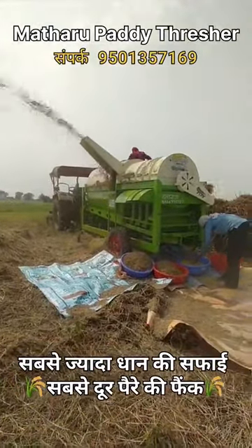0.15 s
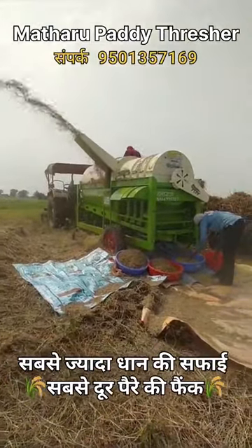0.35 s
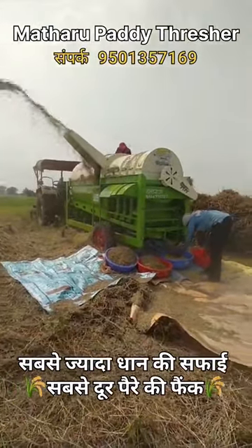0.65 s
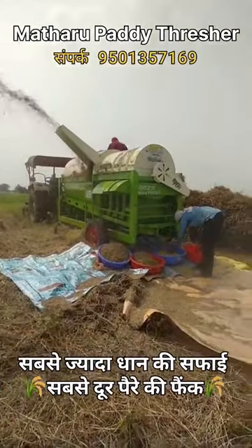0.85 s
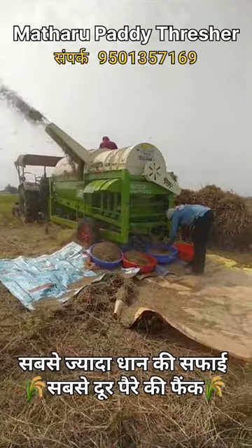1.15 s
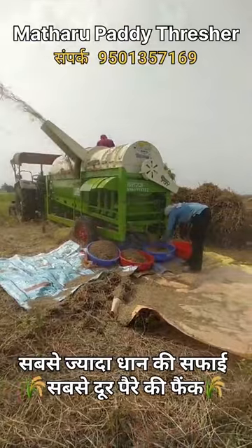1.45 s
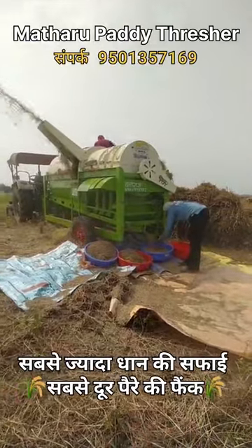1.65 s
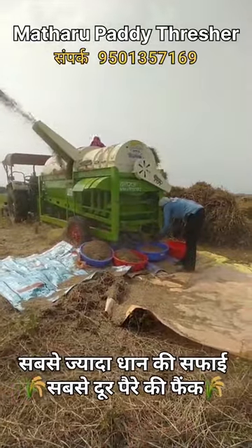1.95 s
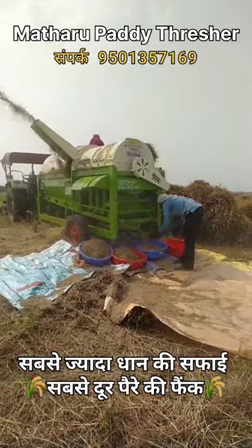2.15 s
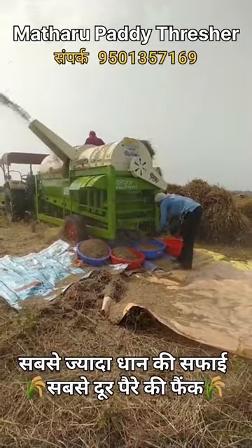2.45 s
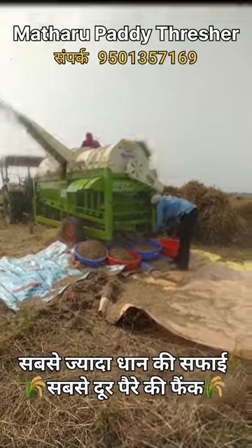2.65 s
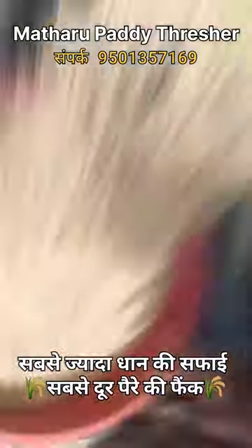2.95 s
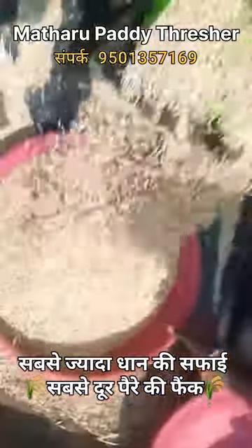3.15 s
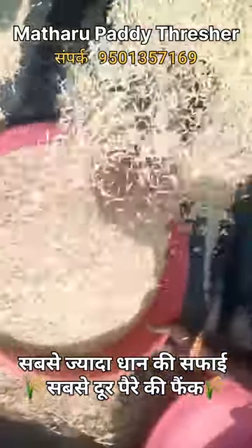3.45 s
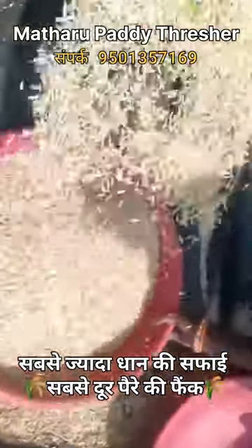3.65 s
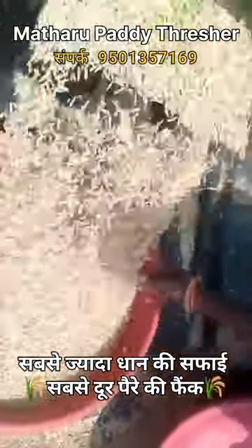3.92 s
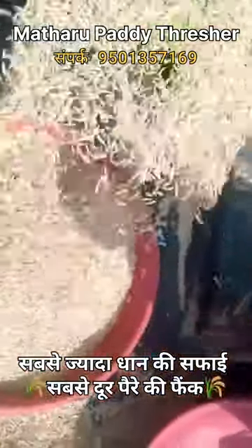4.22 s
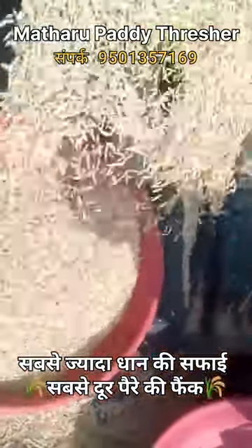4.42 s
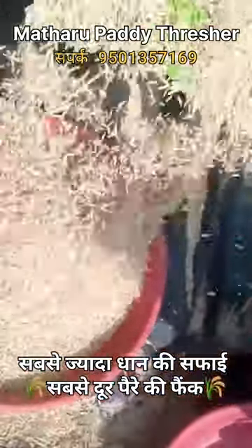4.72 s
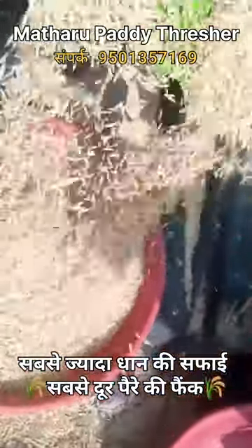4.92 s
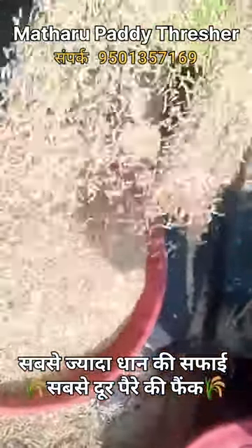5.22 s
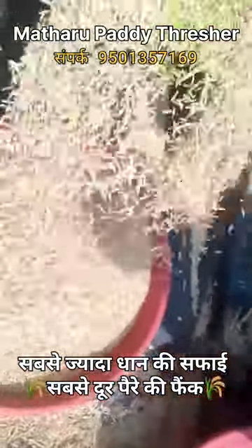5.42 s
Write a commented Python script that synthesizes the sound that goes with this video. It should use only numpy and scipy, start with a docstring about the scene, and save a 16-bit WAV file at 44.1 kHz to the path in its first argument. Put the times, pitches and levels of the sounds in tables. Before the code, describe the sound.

A diesel tractor drives a rice thresher in an open field, heard from a few metres away. The engine throbs loudly under a blower's roar and hissing chaff, with short, sharp slashes as the drum catches straw. About halfway through, the sound cuts to a much quieter close view of the grain outlet: a low hum, a buzzing steel frame, clattering sieves and rice pouring steadily into a basin.

```python
"""A tractor's diesel throbs as it drives a paddy thresher in an open field; the sound is mono.
From a few metres off, exhaust harmonics beat against those of the straw blower, air roars,
and the drum slashes through straw. Then an abrupt change to the grain outlet: the engine is
a quiet hum, the shaft forces a steel frame to buzz, and random impacts excite clattering
sieves, a ringing chute and the basin that the rice pours into."""
import sys
import numpy as np
from scipy import signal
from scipy.fft import rfft, irfft, next_fast_len
from scipy.io import wavfile
from scipy.ndimage import uniform_filter1d

SR = 44100
rng = np.random.default_rng(int(sys.argv[2]) if len(sys.argv) > 2 else 0)


def wrap_up_sound(samples):
    """Save the sound to the file named by the first command line argument, as 16-bit audio."""
    columns = np.atleast_2d(samples).T
    # keep every value between -1 and 1, then stretch to whole-number steps
    tamed = np.clip(columns, -1, 1)
    steps = np.round(tamed * 32767).astype(np.int16)
    wavfile.write(sys.argv[1], SR, steps)


N = 246078
T = np.arange(N) / SR
CUT_S = 3.024  # from the field to the outlet


# Exhaust harmonics: crank_multiple, field_level_db, outlet_level_db
EXHAUST_HARMONICS = [(1, -74, -71), (2, -43, -52), (3, -37.5, -60), (4, -34.5, -64), (5, -41.5, -67.5),
                     (6, -42, -69), (7, -42, -65.5), (9, -46.5, -99), (10, -50, -72)]

def exhaust(crank, at_outlet=False):
    """Periodic gas pulses radiate a harmonic series on the rotation rate of the crank."""
    orders = [(k, outlet_db if at_outlet else field_db) for k, field_db, outlet_db in EXHAUST_HARMONICS]
    return drone(crank, orders, waver_db=1.0)


# Blower harmonics: shaft_multiple, level_db
BLADE_HARMONICS = [(2, -59), (3, -47.5), (4, -31.5), (5, -42), (6, -41.5), (7, -57.5), (12, -49)]

def blower(shaft):
    """Four blades put the strongest tone at the blade-passing frequency, four times the shaft rate."""
    return drone(shaft, BLADE_HARMONICS, waver_db=1.2)


# Air spectrum: frequency_hz, density_db_per_hz
AIR_SPECTRUM = [(20, -89), (48, -78), (70, -67), (110, -55), (155, -58), (245, -59), (400, -58.5),
                (660, -56.5), (765, -59), (850, -73), (1500, -72), (3700, -73), (4100, -84.5),
                (9000, -102.5)]

def air_roar(shaft):
    """Turbulence gives broadband noise, amplitude-modulated as the blades chop the air."""
    gusts = 1 + 0.086 * tone(shaft, 2) + 0.068 * tone(shaft, 4)
    return colour(rng.standard_normal(N) * gusts * amp(0.47 * drift(37)), slope(AIR_SPECTRUM))


# Peaks in the straw's roar, coloured by reflection off the ground: centre_hz, width_hz, peak_db_per_hz
STRAW_ROAR_PEAKS = [(1014, 123, -63), (1151, 325, -64.5), (1355, 430, -69.5), (1696, 154, -65.5),
                    (2088, 176, -67), (2620, 160, -65.5), (3145, 213, -68.5), (3670, 36, -72),
                    (4750, 330, -75.5), (5450, 330, -78), (6740, 250, -74.5)]

def threshing(beaters):
    """Random impacts of straw merge into a roar, with the comb-filter peaks of a ground reflection."""
    impacts = patter(10000, 0.92) * beaters * amp(0.48 * drift(30))
    return colour(impacts, panels(humps(STRAW_ROAR_PEAKS), ripple_db=1.5, spacing_hz=25.04))


# Wads caught by the drum, mostly at the same point of its turn; thick stalks tear duller:
# start_s, level_db, decay_s, tilt_db_per_octave
STRAW_WADS = [(0.054, -32, .014, 0), (0.178, -35.5, .009, -2), (0.325, -34, .006, 4),
              (0.783, -31, .011, -2), (0.905, -26.5, 0.0095, -3), (1.027, -35.5, .008, 6),
              (1.146, -29, .007, -4), (1.268, -32, .008, -1), (1.386, -34, .006, -1),
              (1.992, -33.5, 0.013, 6), (2.114, -34, .01, 0), (2.354, -32, .036, -3)]
# Spectrum of tearing straw: frequency_hz, relative_db
TEAR_SPECTRUM = [(800, -20), (2200, -7), (3300, -1), (4200, -4), (6500, 0), (7750, -1), (8300, -13),
                 (15000, -24)]

def slashes(rise_s=0.004, pivot_hz=5500):
    """Fracture: each wad tears in a burst of snaps that decays exponentially."""
    out = np.zeros(N)
    snaps = patter(14000, 1.6)
    spectrum = slope(TEAR_SPECTRUM)
    for start_s, level_db, decay_s, tilt_db in STRAW_WADS:
        first = round(start_s * SR)
        span = slice(first, first + SR // 4)
        age = T[span] - T[first]
        burst = (1 - np.exp(-age / rise_s)) * np.exp(-age / decay_s)
        gain = lambda hz: spectrum(hz) * amp(tilt_db * np.log2(np.clip(hz / pivot_hz, .5, 2)))
        out[span] += amp(level_db) * burst / burst.max() * evened(colour(snaps[span], gain))
    return out


# Drive gear tones: teeth_per_crank_turn, level_db
GEAR_MESHES = [(36, -48), (54, -71)]

def gear_whine(crank):
    """Gears sound at the tooth-meshing frequency; backlash blurs it by phase modulation."""
    return drone(crank + 0.0017 * drift(7.3), GEAR_MESHES, waver_db=2.0)


# Chaff spectrum: frequency_hz, density_db_per_hz
CHAFF_SPECTRUM = [(2000, -100), (4000, -82.5), (5400, -80), (6000, -77), (7700, -77.5), (8000, -84.3),
                  (10300, -86.7), (11400, -83.8), (12300, -78.7), (13100, -76.7), (15500, -81)]

def chaff_jet(beaters):
    """Dense tiny impacts of chaff merge into a hiss, like shot noise."""
    impacts = patter(40000, .3) * beaters
    return colour(impacts, panels(slope(CHAFF_SPECTRUM), ripple_db=.9, spacing_hz=60))


# Engine speed, sagging as sheaves go in: time_s, speed_rpm
FIELD_SPEED = [(0.0, 1988), (1.2, 1976), (2.14, 2002), (2.53, 1934), (3.02, 1945)]
# Sheaves passing through the drum: start_s, length_s, rise_db
SHEAF_LOADS = [(-0.2, 0.65, 1.5), (0.677, 0.95, 2.5), (1.955, 0.35, 2.0), (2.218, 0.41, 3)]

def field():
    """Exhaust and blower beat at nearby frequencies; each sheaf swells the noises in one arch."""
    crank = np.cumsum(speed(FIELD_SPEED)) / SR
    shaft = crank * .869  # belt ratio; it slips a little more in the field
    drum = crank / 4
    load_db = -1.45  # the nearly empty drum
    for start_s, length_s, rise_db in SHEAF_LOADS:
        load_db += rise_db * np.sin(np.pi * np.clip((T - start_s) / length_s, 0, 1))
    throb = exhaust(crank) + blower(shaft)
    whine = gear_whine(crank)
    roar = amp(0.43 * load_db) * air_roar(shaft)
    beaters = 1 + 0.011 * tone(drum, 5) + 0.024 * tone(drum, 1)  # five rows of pegs sweep the straw
    straw = amp(load_db) * threshing(beaters)
    chaff = amp(0.22 * load_db) * chaff_jet(beaters)
    return throb * amp(.5 * drift(7.0)) + whine + roar + straw + chaff + slashes()


# Envelope of the shaft harmonics: frequency_hz, level_db
BUZZ_SPECTRUM = [(55, -65), (130, -72), (220, -72), (420, -76), (600, -76), (1020, -76), (1200, -65.5),
                 (1330, -52.5), (1560, -72.5), (2080, -65.5), (2600, -89)]
# Sharp modes of the steel frame: centre_hz, width_hz, peak_db
FRAME_MODES = [(255.2, 7.6, -53.5), (299.2, 8.3, -53.5), (374, 9.3, -61), (404.7, 11, -57.5),
               (440.7, 11.7, -56), (506, 9.3, -60.5), (1136, 9.6, -53.5), (1160, 11, -79), (1205, 21, -56),
               (1270, 9.7, -65), (1393, 16, -49.5), (1515, 11, -54.5), (1825, 11, -69), (2215, 15, -57.5),
               (2294, 12, -58.5), (2453, 19, -61.5)]

def frame_buzz(shaft_hz, rattle, odd_db=-5, waver_db=5.0):
    """Forced vibration: shaft harmonics flare up as the speed carries them over the frame's modes."""
    turns = np.cumsum(shaft_hz) / SR + .0007 * drift(30)
    coarse = slice(None, None, SR // 50)
    out = np.zeros(N)
    for k in range(2, 90):
        hz = k * shaft_hz[coarse]
        waver = np.tanh(evened(uniform_filter1d(rng.standard_normal(len(hz)), size=11)))
        # two knocks a turn favour even harmonics
        bed = slope(BUZZ_SPECTRUM)(hz) * amp(odd_db * (k % 2) + waver_db * waver)
        level = np.interp(T, T[coarse], np.hypot(bed, humps(FRAME_MODES)(hz)))
        in_sieve_range = 1000 < hz.mean() < 1600
        out += level * (rattle if in_sieve_range else 1) * tone(turns, k)
    return out


# Sieve tray resonances: centre_hz, width_hz, peak_db_per_hz
SIEVE_MODES = [(1120, 87, -91), (1288, 170, -72.5), (2850, 90, -90), (5490, 100, -89.5), (5760, 70, -92)]

def sieves(knocks):
    """Impact excitation: uneven blows make the loose trays clatter at their modes."""
    return colour(patter(3500, 2.3) * knocks, humps(SIEVE_MODES))


# Spectrum of rice landing in the basin: frequency_hz, density_db_per_hz
RICE_SPECTRUM = [(900, -100), (1600, -77.5), (2050, -78.5), (2400, -87), (2700, -86), (3400, -93.5),
                 (4400, -93), (5100, -97), (5900, -97.5), (6700, -101), (8400, -98), (9500, -111),
                 (12000, -125)]

def rice():
    """Independent grain impacts superpose into a steady pouring noise."""
    return colour(patter(12000, 0.57), panels(slope(RICE_SPECTRUM), ripple_db=2.5, spacing_hz=48.5))


# Grain chute resonances: centre_hz, width_hz, peak_db_per_hz
CHUTE_MODES = [(3760, 120, -88.5), (4000, 70, -81), (4130, 50, -83), (4950, 50, -96)]

def chute(fade_db_per_s=1.4):
    """Grains ring the steel chute at its natural frequencies; the ring slowly dies down."""
    fade = amp(-fade_db_per_s * (T - T[T > CUT_S].mean()))
    return fade * colour(patter(7000, 0.89), humps(CHUTE_MODES))


# Noise inside the machine: frequency_hz, density_db_per_hz
RUMBLE_SPECTRUM = [(20, -100), (48, -95), (80, -83), (120, -79.5), (190, -88), (235, -69.5), (275, -81),
                   (430, -78.5), (560, -84), (800, -87.5), (1100, -81.5), (3000, -105), (10000, -110),
                   (15500, -110.5)]

def rumble():
    """Stationary random noise with most of its power at low frequencies."""
    return colour(rng.standard_normal(N), slope(RUMBLE_SPECTRUM))


# Engine speed, hunting slowly under the governor: time_s, speed_rpm
OUTLET_SPEED = [(3.22, 1918), (3.56, 1976), (4.0, 1899), (4.2, 1895), (4.86, 2004), (5.58, 1945)]
# How hard the frame and sieves rattle: time_s, gain_db
RATTLE_GAIN = [(3.03, -2.3), (3.95, -2.6), (4.65, 0.5), (4.82, 1), (5.2, 1.5), (5.58, -1)]

def outlet(belt_ratio=.8715, turns_per_stroke=5, flow_db_per_percent=0.22):
    """A common drive modulates the sources: the faster the sieves shake, the more rice comes down."""
    crank_hz = speed(OUTLET_SPEED)
    crank = np.cumsum(crank_hz) / SR
    shaft = crank * belt_ratio
    stroke_db = .5 * tone(shaft / turns_per_stroke, 1)  # the sieves rattle harder once a stroke
    rattle = amp(np.interp(T, *np.transpose(RATTLE_GAIN)) + stroke_db)
    overspeed_percent = 100 * (crank_hz / crank_hz[T > CUT_S].mean() - 1)
    flow = amp(flow_db_per_percent * overspeed_percent)
    hum = exhaust(crank, at_outlet=True)
    # loose parts flutter with the shaft
    knocks = 1 + 0.076 * tone(shaft, 1) + 0.047 * tone(shaft, 2) + 0.092 * drift(90)
    noises = rattle * sieves(knocks) + flow * (chute() + rice()) + rumble()
    return hum + noises + frame_buzz(crank_hz * belt_ratio, rattle * knocks)


def amp(db):
    """Decibels to amplitude ratio."""
    return 10 ** (np.asarray(db) / 20)


def evened(x):
    """Normalisation to unit rms."""
    return x / np.sqrt(np.mean(x ** 2) + 1e-20)


def speed(rows):
    """Rotation rate in Hz, interpolated from points in rpm."""
    return np.interp(T, *np.transpose(rows)) / 60


def tone(turns, multiple):
    """One harmonic of a rotation, with unit rms and random phase."""
    return np.sqrt(2) * np.cos(2 * np.pi * (round(multiple) * turns + rng.random()))


def drone(turns, orders, waver_db):
    """Superposed shaft harmonics, each wavering in level."""
    return sum(amp(db + waver_db * drift(4.1)) * tone(turns, k) for k, db in orders)


def drift(rate_hz):
    """Low-pass noise: a smooth random fluctuation of unit rms."""
    hz = np.fft.rfftfreq(N, 1 / SR)
    return evened(irfft(rfft(rng.standard_normal(N)) * np.exp(-(hz / rate_hz) ** 2), N))


def patter(per_s, spread_db):
    """A random impulse train: tiny impacts, a few larger than the rest."""
    size = amp(spread_db * np.minimum(rng.exponential(1, N), 4))
    return evened(size * rng.standard_normal(N) * (rng.random(N) < per_s / SR))


def slope(points):
    """Frequency response, straight between points on log axes."""
    f, db = np.transpose(points)
    return lambda hz: amp(np.interp(np.log(hz + 1), np.log(f + 1), db))


def humps(peaks):
    """Frequency response of steep-sided peaks, summed in power."""
    return lambda hz: np.sqrt(sum((amp(db) / (1 + 2 * ((hz - centre) / width) ** 2)) ** 2
                                  for centre, width, db in peaks))


def panels(gain, ripple_db, spacing_hz):
    """High modal density: sheet steel lays fine ridges over a frequency response."""
    ridges = np.clip(rng.standard_normal(4000), -2, 2)
    return lambda hz: gain(hz) * amp(ripple_db * np.interp(hz / spacing_hz, range(len(ridges)), ridges))


def colour(x, gain):
    """Linear filtering of a white drive, so that gain sets its spectral density."""
    size = next_fast_len(len(x))
    spectrum = rfft(evened(x), size) * gain(np.fft.rfftfreq(size, 1 / SR))
    return irfft(spectrum, size)[:len(x)] * np.sqrt(SR / 2)


def scene():
    """The field, then a 3 ms crossfade to the outlet, alike in both channels."""
    outlet_share = np.clip((T - CUT_S) / .003 + .5, 0, 1)
    return np.tile((1 - outlet_share) * field() + outlet_share * outlet(), (2, 1))


def record(dry, cutoff_hz=15520):
    """A steep low-pass filter limits the bandwidth."""
    lowpass = signal.firwin(511, cutoff_hz, window=("kaiser", 9), fs=SR)
    return signal.oaconvolve(dry, lowpass[None], "same")


dry = scene()
out = record(dry)
wrap_up_sound(out)
```